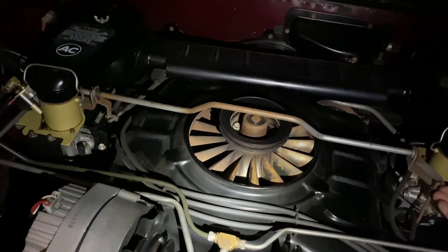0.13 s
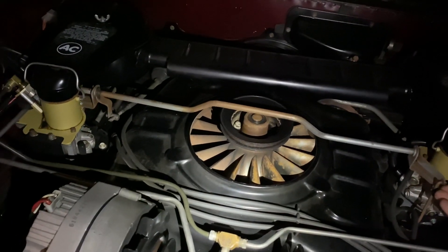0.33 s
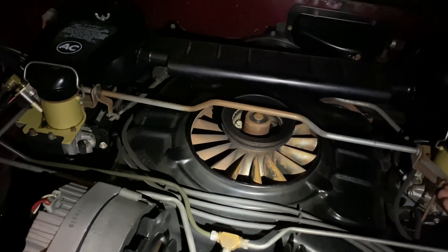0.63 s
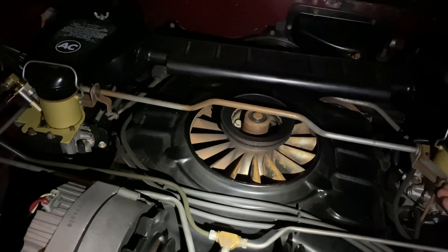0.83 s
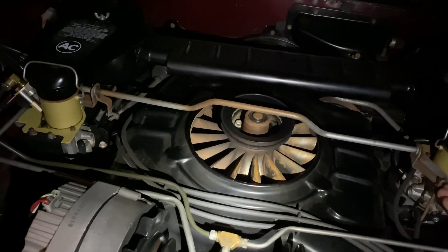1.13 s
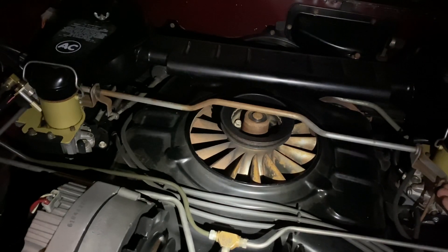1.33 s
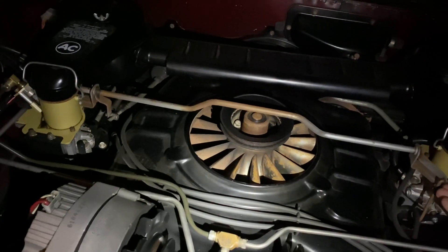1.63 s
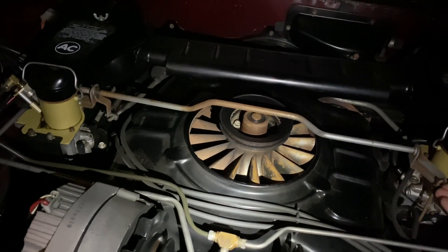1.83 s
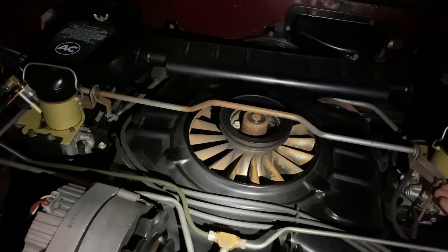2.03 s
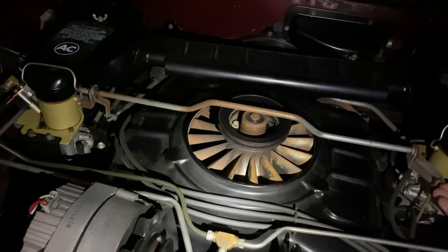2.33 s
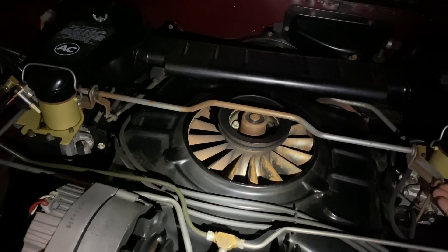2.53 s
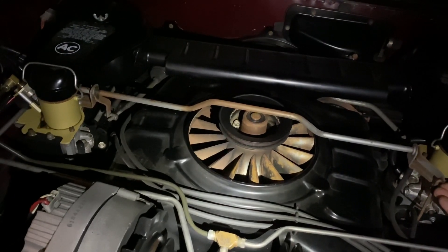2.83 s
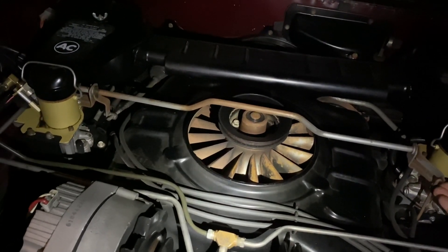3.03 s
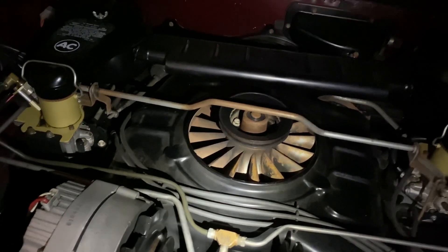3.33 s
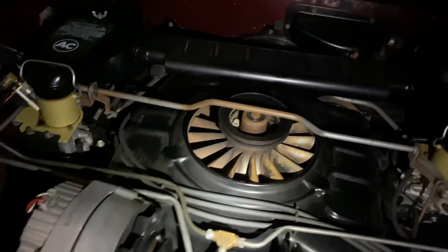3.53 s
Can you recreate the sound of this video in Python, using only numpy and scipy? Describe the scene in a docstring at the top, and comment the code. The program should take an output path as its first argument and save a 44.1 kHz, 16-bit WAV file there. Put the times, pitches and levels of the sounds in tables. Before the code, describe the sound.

An air-cooled car engine idles close by, speeding up slightly around 0.4 seconds, then holding steady. A deep, rapid exhaust throb, with occasional weaker beats, sits under fan rush, knocking, a pulsing intake hiss and light valve ticks. At about 3.3 seconds the firing stops and the engine coasts more quietly until 3.7, with short puffs of air, a few soft thumps and one metal clank near 3.4.

```python
"""Close by an open engine lid, an air-cooled six-cylinder idles. The fan rushes, knocks ring the block,
the intake hisses on each stroke and tappets tick against thin metal. Underneath, the two banks thump
in turn down the exhaust pipe, and now and then a cylinder fires weakly. Near the end the firing
drops out and the engine coasts with sharp puffs of air, a few soft thumps and one clank."""
import sys
import numpy as np
from scipy import signal
from scipy.fft import rfft, irfft
from scipy.io import wavfile
from scipy.ndimage import uniform_filter1d

SR = 44100
rng = np.random.default_rng(int(sys.argv[2]) if len(sys.argv) > 2 else 0)


def master_out(mix):
    """Clip the mix to full scale and print it as 16-bit PCM to the path in sys.argv[1]."""
    frames = np.transpose(np.atleast_2d(mix))
    ceiling = np.clip(frames, -1, 1)
    pcm = np.round(ceiling * 32767).astype(np.int16)
    wavfile.write(sys.argv[1], SR, pcm)


N = 163170

# Crank speed: (time [s], speed [rpm])
CRANK_SPEED = [(0.0, 839.0), (0.14, 830.0), (0.3, 914.0), (0.45, 1039.0), (0.6, 972.0), (0.85, 979.0),
               (1.08, 951.0), (1.22, 999.0), (1.45, 969.0), (1.7, 972.0), (1.95, 951.0), (2.2, 969.0),
               (2.45, 979.0), (2.65, 967.0), (2.82, 996.0), (3.0, 954.0), (3.3, 967.0)]
# Fader ride on the running gear: (time [s], level [dB])
GEAR_FADER = [(0, 1), (.3, 2.5), (3.28, 1), (3.35, -3.5), (3.43, -8), (3.47, -11.5), (3.62, -10.5),
              (3.7, -12)]
# Colour of the fan rush: (frequency [Hz], level [dB])
FAN_COLOUR = [(100, 2.5), (210, -9.5), (400, -0.5), (900, -6.5), (1400, -7.5), (2200, -13), (4000, -21),
              (8000, -37), (16000, -85)]
# EQ on the fan's side signal: (frequency [Hz], gain [dB])
FAN_SIDE_EQ = [(100, -16), (300, -23), (700, -14.5), (1500, -11.5), (16000, -15.5)]
# Resonances of block and shrouds: (frequency [Hz], width [Hz], level [dB])
BLOCK_MODES = [(314, 36, 3.5), (354, 31, -3), (416, 44, -18), (508.7, 48, -1.5), (656, 15.3, -1.5),
               (812, 33, -5), (930, 24, -6), (1385, 116, -8)]
# Knock pattern: (place [cycles], level [dB], brightest frequency [Hz])
KNOCK_PATTERN = [(.0, 4, 510), (0.991, -5, 333), (.05, -1.5, 655), (.06, -4, 1385), (.14, -0.5, 630),
                 (.15, -2, 930), (.18, -4, 1385), (0.201, -4, 505), (0.259, 0, 348), (.28, 0, 860),
                 (.46, -1.5, 670), (0.581, -6.5, 493), (.59, -4, 812), (0.621, -3.5, 357), (.79, -0.5, 655),
                 (0.841, 2, 427), (.85, -7, 1385)]
# Intake stroke pattern: (place [cycles], level [dB])
STROKE_PATTERN = [(.09, 0), (.28, -15), (.45, 1.5), (.6, -4), (0.755, 2)]
# Colour of the intake air: (frequency [Hz], level [dB])
HISS_COLOUR = [(1500, -15), (4000, -4.5), (5000, 0), (6300, 4.5), (8500, -4.5), (10000, 4), (12000, -6),
               (14200, -1.5), (16000, -5.5)]
# Exhaust pipe resonances: (frequency [Hz], width [Hz], level [dB])
PIPE_MODES = [(45.9, 15, 5.6), (67.2, 11.5, 16), (101.6, 17, 3.9), (158.9, 18.5, .6)]
# Weak firings: (time [s], level change [dB])
WEAK_FIRINGS = [(.055, -7), (1.01, -3), (1.26, -1), (1.5, -3), (1.75, -4), (1.915, -3.5), (2.358, -8),
                (2.608, -12), (2.865, -1.5), (3.11, -2)]
# Tappet pattern: (place [cycles], level [dB], brightest frequency [Hz])
TAPPET_PATTERN = [(0.102, -0.5, 2330), (.3, -1, 1400), (.455, -0.5, 3250), (.49, -7, 2500),
                  (0.519, -4, 2920), (.59, -6.5, 2900), (.625, 3, 1750), (.635, -2, 3060), (.67, -1, 2470),
                  (0.771, -8, 3300)]
# Thin metal rung by the tappets: (frequency [Hz], width [Hz], level [dB])
TIN_MODES = [(1330, 70, -10), (1680, 100, 6), (1990, 90, 4), (2160, 33, 6), (2500, 92, 2), (2846, 69, 2),
             (2987, 27, -4.5), (3186, 73, -1), (3330, 2250, 5)]
# Air puffs while coasting: (time [s], level [dB], hold [s])
COAST_PUFFS = [(3.324, -29, 0.0076), (3.387, -29, 0.0057), (3.492, -29, 0.008), (3.562, -49, 0.009),
               (3.606, -29, 0.013), (3.696, -45, 0.011)]
# Thumps while coasting: (time [s], level [dB], pitch [Hz], decay [s])
COAST_THUMPS = [(3.351, -14.5, 68.5, 0.025), (3.403, -8.5, 65.4, 0.013), (3.461, -18, 59, 0.071),
                (3.585, -16, 60.4, 0.018), (3.618, -14, 62, 0.014), (3.659, -10.5, 75.6, 0.012),
                (3.686, -9.5, 65, 0.021)]

CUT_S = 3.315  # the firing stops
HISS_EDGES_HZ = [1000, 5500, 8600, 12200, 17000]
NEAR_BANK_PLACE, FAR_BANK_DELAY, FAR_BANK_DB = -0.096, 0.142, 5  # place and delay in cycles
THUMP_TOP_HZ, SLOW_LOSS_DB = 122, 3  # loss per 100 rpm under 900


def undb(db):
    return 10 ** (np.asarray(db) / 20)


def level(x, rms_db):
    return x * undb(rms_db) / np.sqrt(np.mean(x ** 2))


def curve(rows, at):
    return np.interp(at, *np.array(rows, float).T)


def noise(colour):
    """Noise shaped to a colour curve, at unit RMS."""
    hz, db = np.array(colour, float).T
    log_hz = np.log(np.arange(N // 2 + 1) * SR / N + 1)
    eq = undb(np.interp(log_hz, np.log(hz), db))
    return level(irfft(rfft(rng.standard_normal(N)) * eq, N), 0)


def ring(x, hz, width_hz):
    """A damped resonance: a click becomes a fading sine."""
    r, w = np.exp(-np.pi * width_hz / SR), 2 * np.pi * hz / SR
    return signal.lfilter([0, 2 * (1 - r) * np.sin(w)], [1, -2 * r * np.cos(w), r * r], x)


def wander(rate_hz):
    """Smooth random drift with a spread near 1."""
    hold = int(SR / rate_hz)
    steps = np.repeat(rng.standard_normal(N // hold + 1), hold)
    return 1.25 * uniform_filter1d(uniform_filter1d(steps, hold), hold)[:N]


def clicks(times, db):
    """A click of the given level at each time."""
    out, at = np.zeros(N), np.round(times * SR).astype(int)
    inside = (at >= 0) & (at < N)
    np.add.at(out, at[inside], undb(db)[inside])
    return out


def bursts(cycle, place, db, decay_s, rise_samples):
    """An envelope struck once a cycle, a little loose in timing and level."""
    jitter, scatter = rng.standard_normal((40, 2)).T
    times = np.interp(np.arange(40) + place + 0.0053 * jitter, cycle, np.arange(N) / SR, -1, 99)
    tails = signal.lfilter([1], [1, -np.exp(-1 / (decay_s * SR))], clicks(times, db + 1.2 * scatter))
    return uniform_filter1d(tails, rise_samples)


def send(hz, pattern, hits, spread_oct):
    """Mix the hits for one resonance, favouring those brightest near it."""
    return sum(np.exp(-(np.log2(hz / brightest) / spread_oct) ** 2) * hit
               for (_, _, brightest), hit in zip(pattern, hits))


def pan(x, lag_ms, left_db):
    """Stereo position: the left side's delay and level against the right."""
    hz = np.arange(N // 2 + 1) * SR / N
    left = irfft(rfft(x) * np.exp(-2j * np.pi * hz * lag_ms / 1000), N)
    return np.array([left * undb(left_db / 2), x * undb(-left_db / 2)])


def fan():
    """A fluttering bed of cooling air, wider towards the treble."""
    side_eq = [(np.log(hz), db) for hz, db in FAN_SIDE_EQ]
    side = noise([(hz, db + curve(side_eq, np.log(hz))) for hz, db in FAN_COLOUR]) * undb(-5.5)
    return undb(-23.5 + wander(23)) * (noise(FAN_COLOUR) + np.array([side, -side]))


def block(cycle):
    """Knocks over a steady shudder ring the block; the two highest rings sit further left."""
    knocks = [bursts(cycle, at, db, decay_s=0.0044, rise_samples=8) for at, db, _ in KNOCK_PATTERN]
    shudder, rings = 0.49, []
    for hz, width, db in BLOCK_MODES:
        envelope = shudder + send(hz, KNOCK_PATTERN, knocks, spread_oct=0.24)
        attack_click = 45.5 * np.maximum(np.gradient(envelope), 0)
        shake = envelope * rng.standard_normal(N) + attack_click
        rings.append(undb(db) * ring(shake, hz, width) * hz / width ** .5)
    return level(pan(sum(rings[:6]), -0.06, -1) + pan(sum(rings[6:]), 0.081, 4.8), -25)


def intake(t, cycle, gear):
    """Air hisses in strokes, then puffs, over a faint leak; the lid scatters it and each band flickers."""
    strokes = sum(bursts(cycle, at, db, decay_s=0.0078, rise_samples=340) for at, db in STROKE_PATTERN)
    leak = undb(-36) * gear ** 0.9
    envelope = undb(-25.5) * strokes * (t < CUT_S) + leak + puffs(t)
    direct = pan(noise(HISS_COLOUR), 0.2918, 1)
    scattered = undb(-7.5) * np.array([noise(HISS_COLOUR), noise(HISS_COLOUR)])
    hiss = 0
    for edges in zip(HISS_EDGES_HZ, HISS_EDGES_HZ[1:]):
        band = signal.butter(3, edges, "band", fs=SR, output="sos")
        hiss += undb(wander(90)) * signal.sosfilt(band, direct + scattered)
    return envelope * hiss


def exhaust(t, cycle):
    """The low end: two banks fire in turn, three times a cycle each, and ring the pipe until the cut."""
    scatter_db, jitter = rng.standard_normal((200, 2)).T
    firing = np.arange(200)
    far = firing % 2
    times = np.interp(firing // 2 / 3 + NEAR_BANK_PLACE + FAR_BANK_DELAY * far, cycle, t, -1, 99)
    db = scatter_db + FAR_BANK_DB * far
    for when, change_db in WEAK_FIRINGS:
        db[np.argmin(abs(times - when))] += change_db
    times += 0.00035 * jitter
    pulses = (clicks(times[1::2], db[1::2]) - clicks(times[::2], db[::2])) * (t < CUT_S)
    pipe = sum(undb(mode_db) * ring(pulses, hz, width) for hz, width, mode_db in PIPE_MODES)
    thumps = signal.sosfilt(signal.butter(6, THUMP_TOP_HZ, fs=SR, output="sos"), pipe)
    sag = undb(-SLOW_LOSS_DB * np.maximum(900 - curve(CRANK_SPEED, t), 0) / 100)
    choke = np.exp(-np.maximum(t - CUT_S - .01, 0) / 0.014)
    return level(thumps, -8) * sag * choke


def tappets(cycle):
    """Each valve tick is a short rattle that rings thin metal around its own pitch."""
    rattles = [bursts(cycle, at, db, decay_s=0.0038, rise_samples=130) * rng.standard_normal(N)
               for at, db, _ in TAPPET_PATTERN]
    tin = 0
    for hz, width, db in TIN_MODES:
        shake = send(hz, TAPPET_PATTERN, rattles, spread_oct=0.27)
        tin += undb(db) * ring(shake, hz, width) * hz / width ** .5
    return level(tin, -34)


def puffs(t, attack_s=0.0007, decay_s=0.0064):
    """Envelope for the coasting engine's lone puffs of air: snap open, hold, fade."""
    return sum(undb(db) * np.clip((t - start) / attack_s, 0, 1)
               * np.exp(-np.maximum(t - start - hold, 0) / decay_s) for start, db, hold in COAST_PUFFS)


def coasting_thumps(t, attack_s=0.0039):
    """With no firing left, the exhaust gives soft thumps, each a low fading sine."""
    out = np.zeros(N)
    for start, db, hz, decay_s in COAST_THUMPS:
        age = np.maximum(t - start, 0)
        envelope = (1 - np.exp(-age / attack_s)) * np.exp(-age / decay_s)
        out -= 2 * undb(db) * envelope * np.sin(2 * np.pi * hz * age)
    return out


def clank(t, start_s=3.408, decay_s=0.014):
    """One brief, rough ring of sheet metal while the engine coasts."""
    hit = (t > start_s) * np.exp(-np.maximum(t - start_s, 0) / decay_s) * rng.standard_normal(N)
    sheet = ring(hit, hz=1400, width_hz=220)
    return sheet * undb(-15.5) / abs(sheet).max()


def scene():
    """Mix the layers; one four-stroke cycle, two turns of the crank, clocks the idle."""
    t = np.arange(N) / SR
    cycle = 0.132 + np.cumsum(curve(CRANK_SPEED, t)) / 120 / SR
    gear = undb(curve(GEAR_FADER, t))
    machinery = block(cycle) + pan(tappets(cycle), -0.052, 6.4) + fan()
    low_end = pan(exhaust(t, cycle) + coasting_thumps(t), 0.18, 0.2)
    return low_end + clank(t) + gear * machinery + intake(t, cycle, gear)


def record(dry):
    """The microphones drop the deepest bass, round the peaks and cut the top."""
    trimmed = signal.sosfilt(signal.butter(4, 44, "high", fs=SR, output="sos"), dry)
    rounded = np.tanh(0.57 * trimmed) / 0.58
    return signal.sosfilt(signal.ellip(10, .2, 80, 16050, fs=SR, output="sos"), rounded)


dry = scene()
out = record(dry)
master_out(out)
```